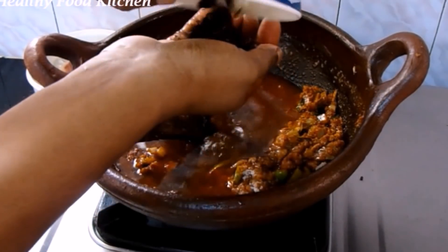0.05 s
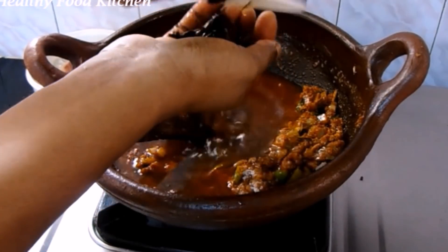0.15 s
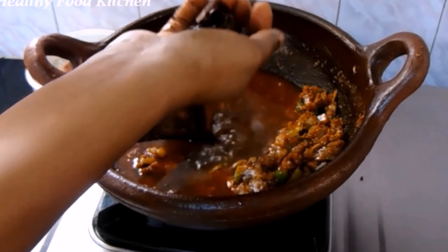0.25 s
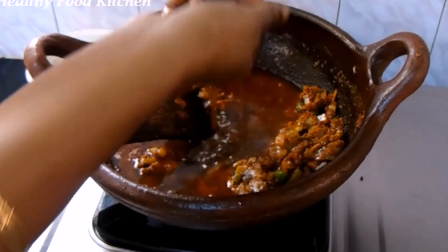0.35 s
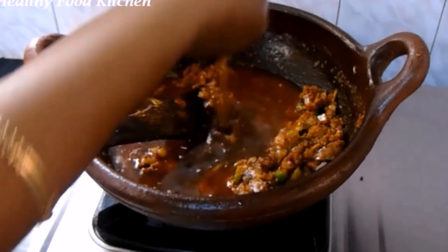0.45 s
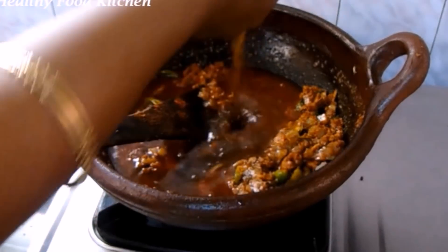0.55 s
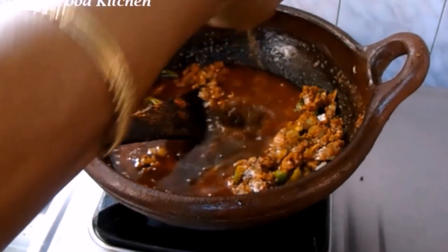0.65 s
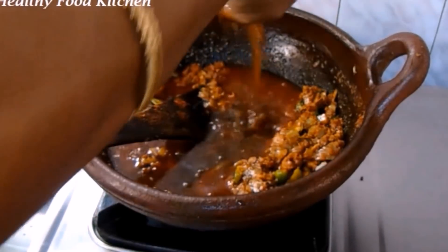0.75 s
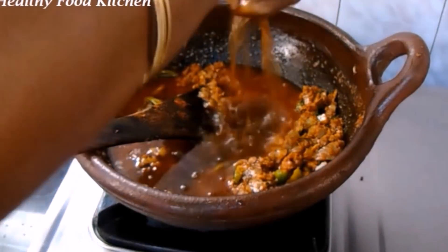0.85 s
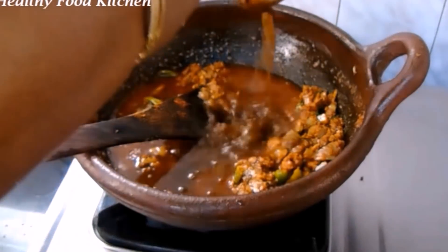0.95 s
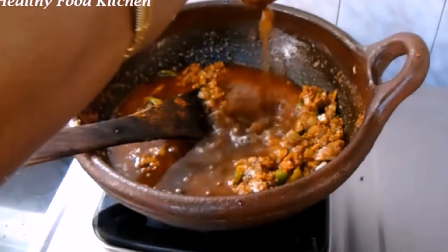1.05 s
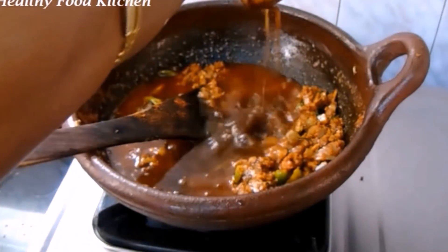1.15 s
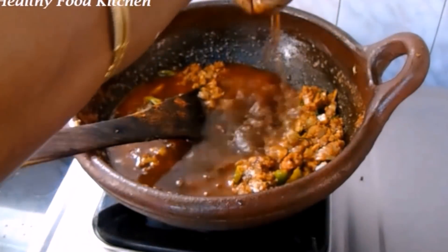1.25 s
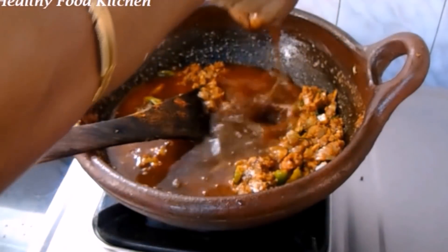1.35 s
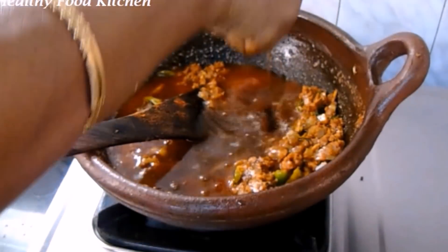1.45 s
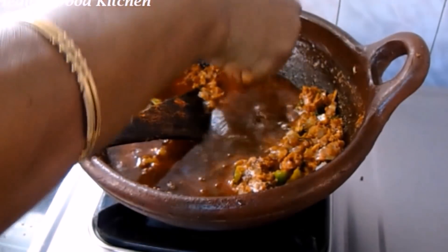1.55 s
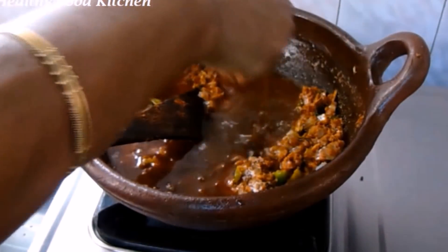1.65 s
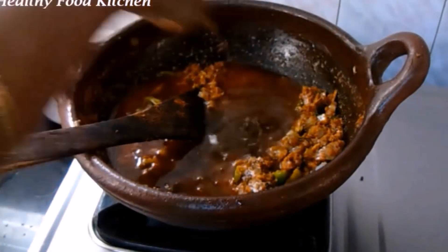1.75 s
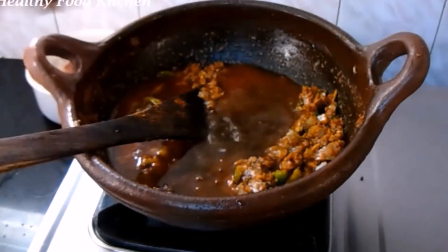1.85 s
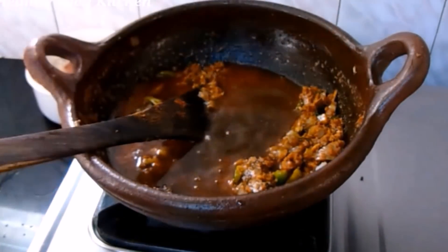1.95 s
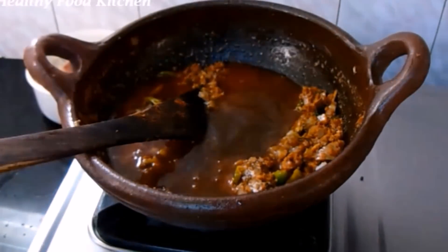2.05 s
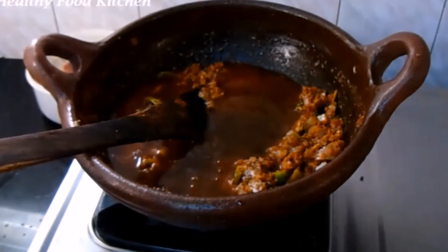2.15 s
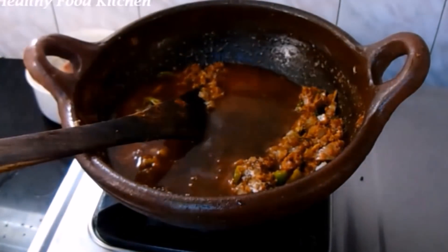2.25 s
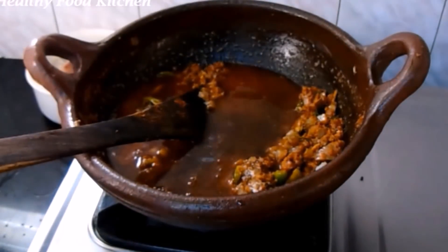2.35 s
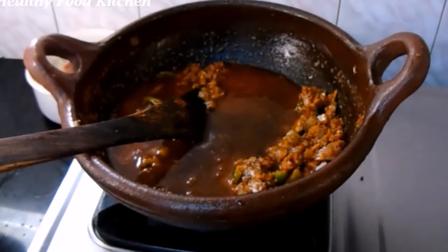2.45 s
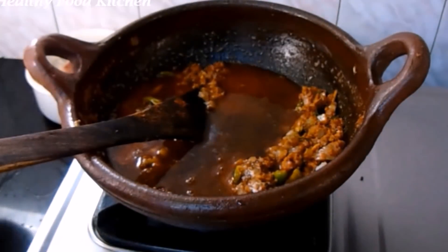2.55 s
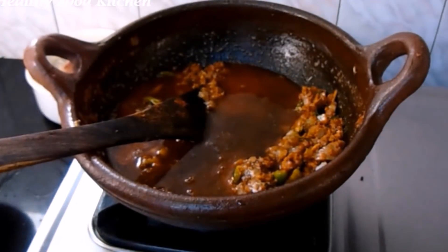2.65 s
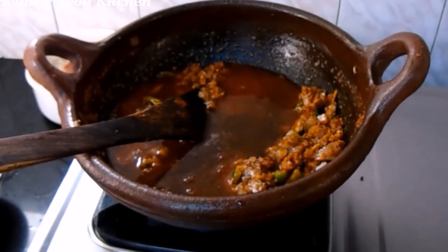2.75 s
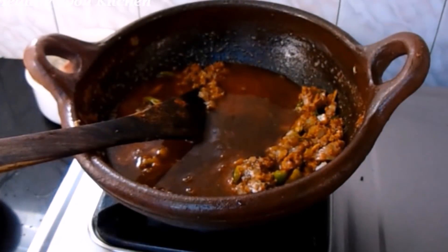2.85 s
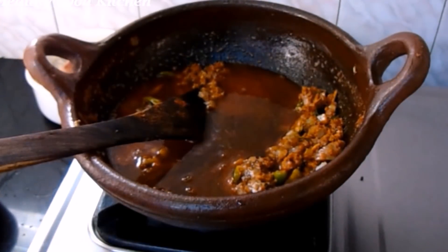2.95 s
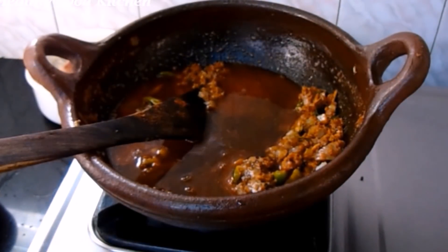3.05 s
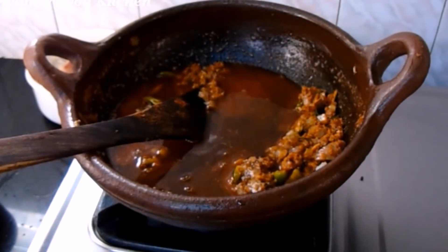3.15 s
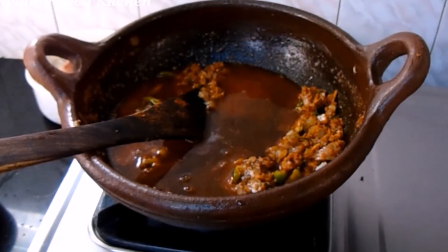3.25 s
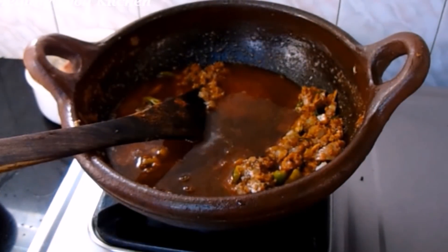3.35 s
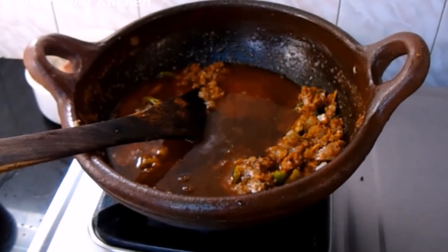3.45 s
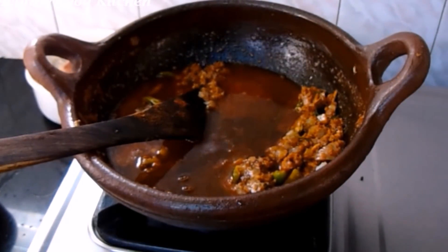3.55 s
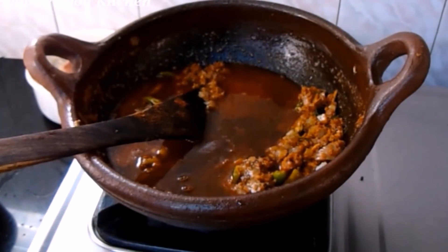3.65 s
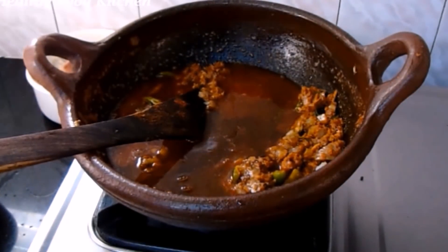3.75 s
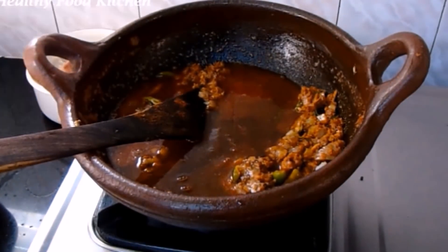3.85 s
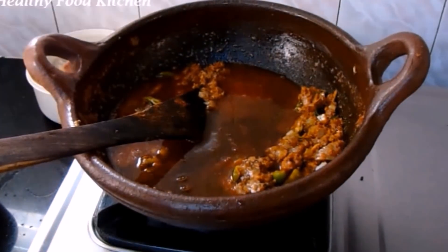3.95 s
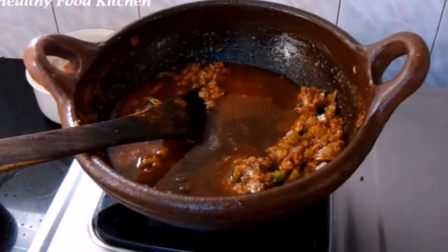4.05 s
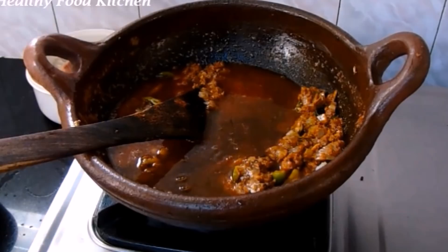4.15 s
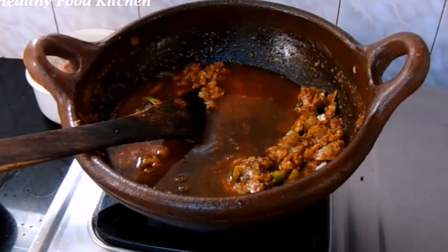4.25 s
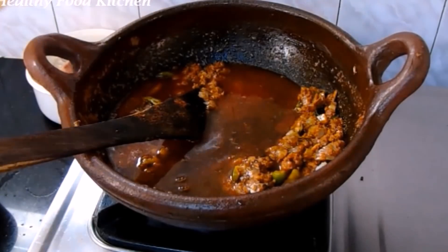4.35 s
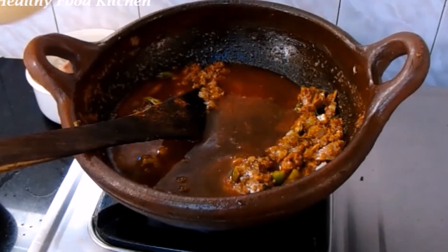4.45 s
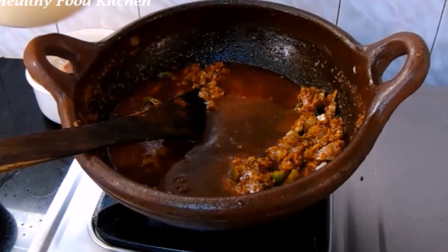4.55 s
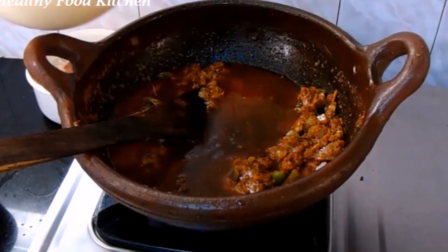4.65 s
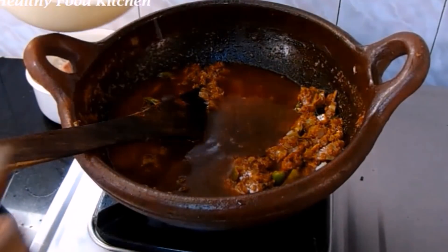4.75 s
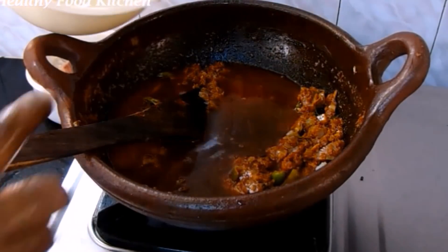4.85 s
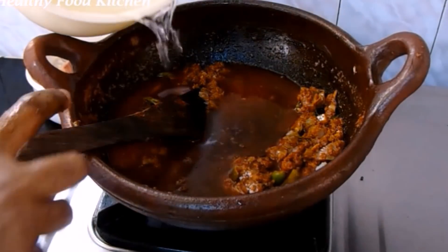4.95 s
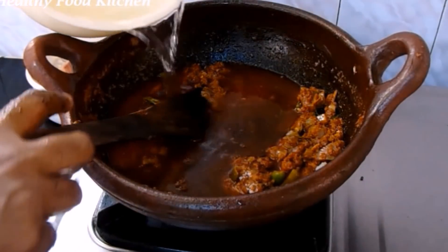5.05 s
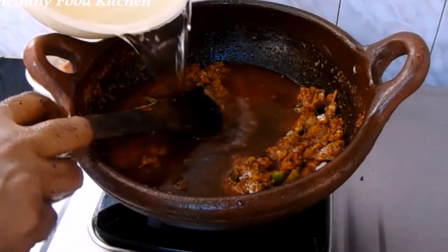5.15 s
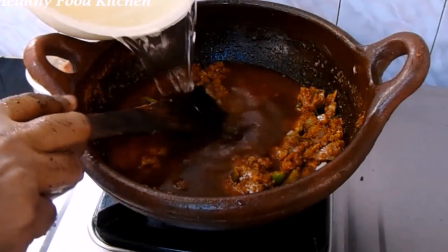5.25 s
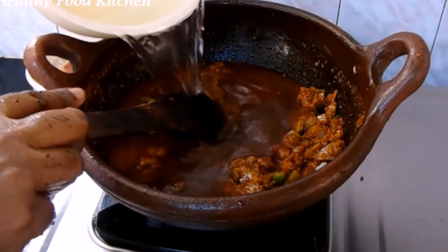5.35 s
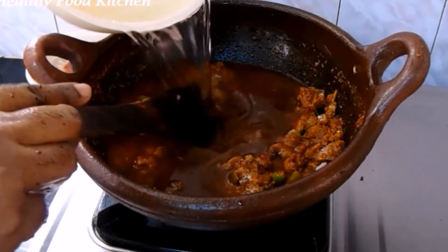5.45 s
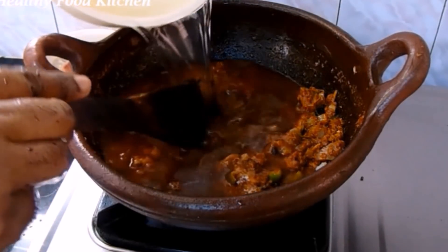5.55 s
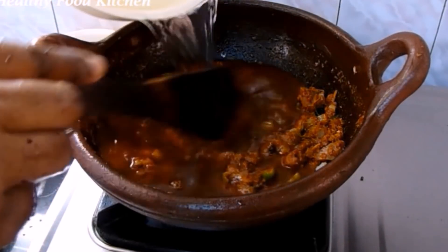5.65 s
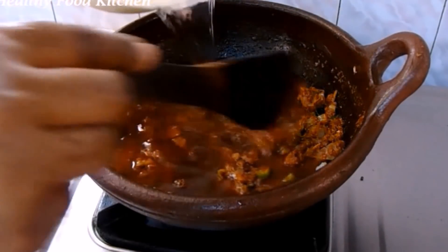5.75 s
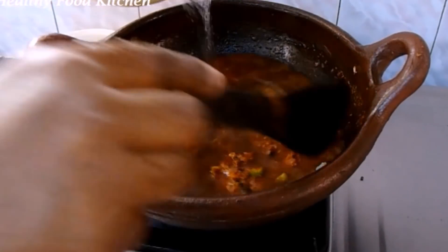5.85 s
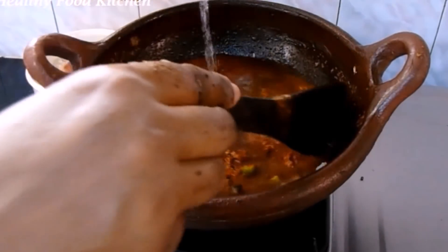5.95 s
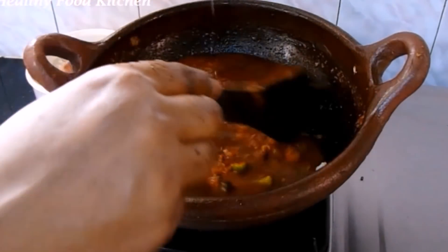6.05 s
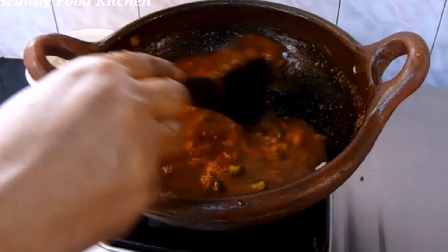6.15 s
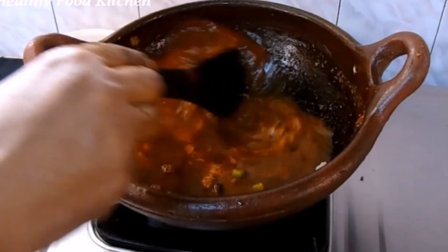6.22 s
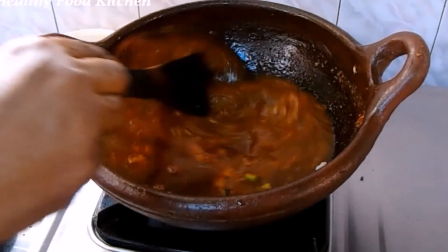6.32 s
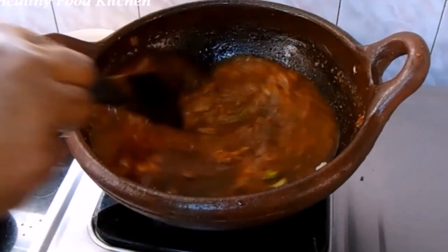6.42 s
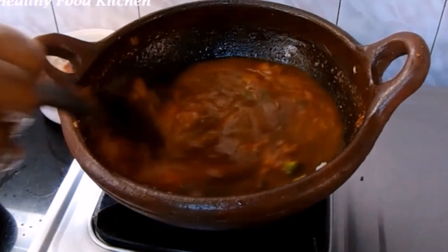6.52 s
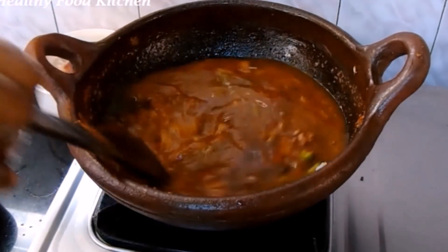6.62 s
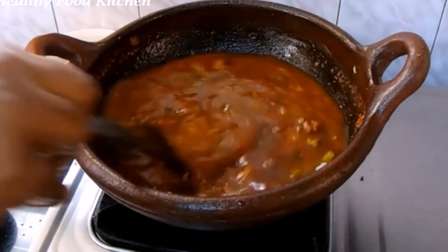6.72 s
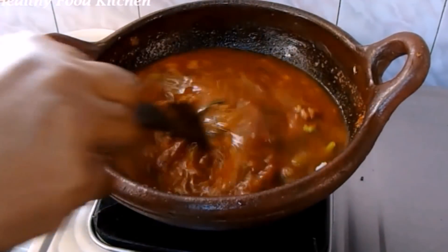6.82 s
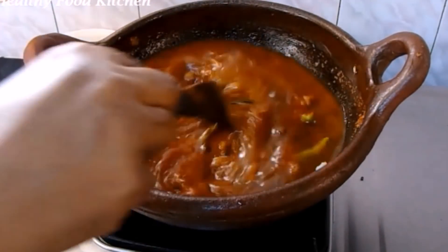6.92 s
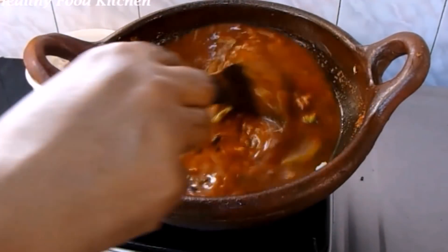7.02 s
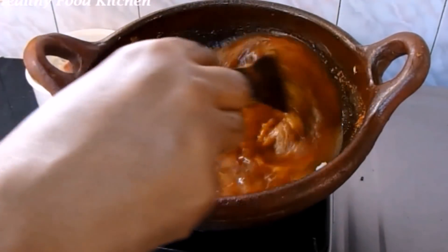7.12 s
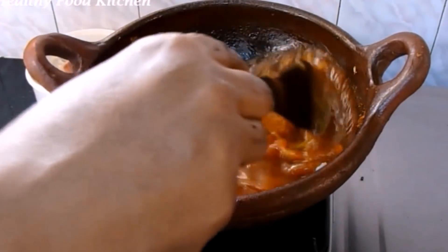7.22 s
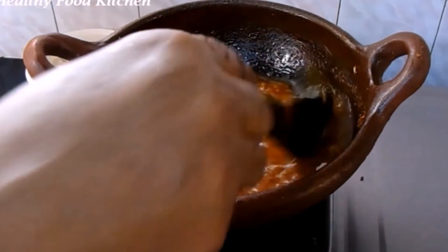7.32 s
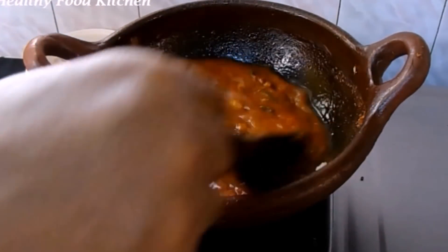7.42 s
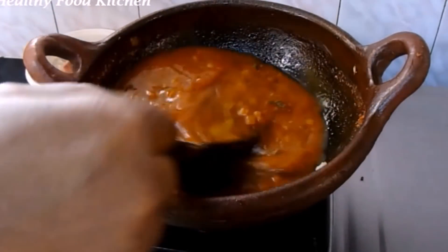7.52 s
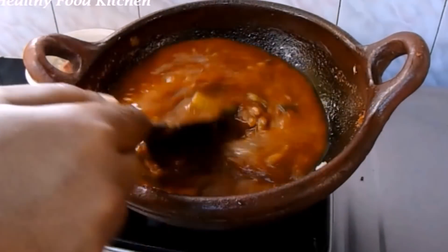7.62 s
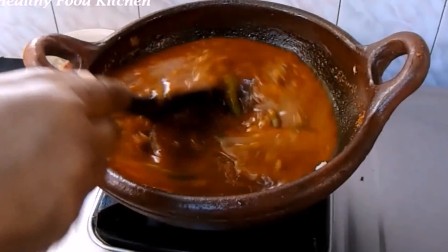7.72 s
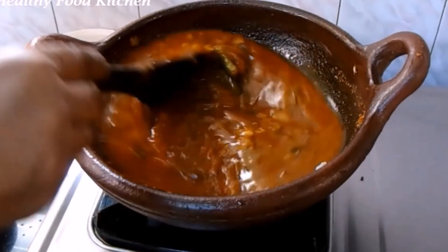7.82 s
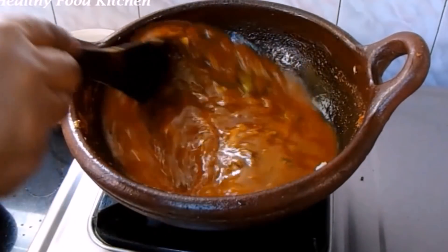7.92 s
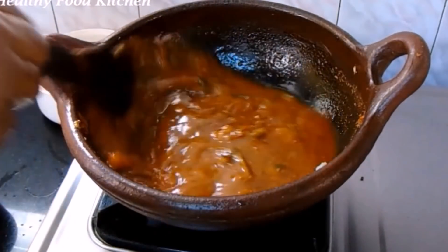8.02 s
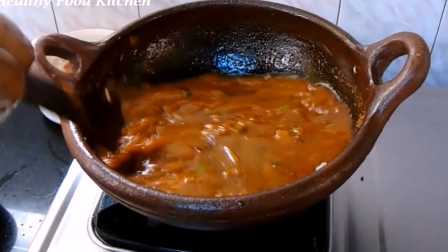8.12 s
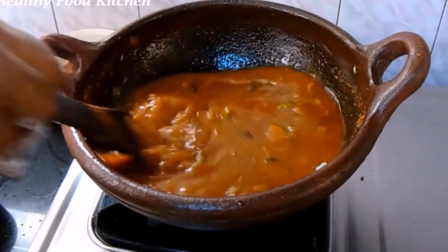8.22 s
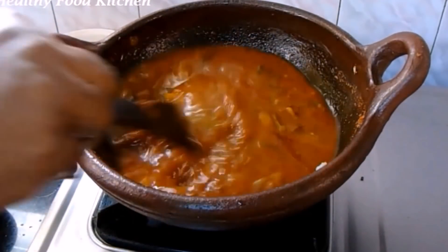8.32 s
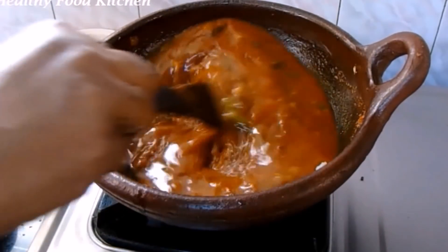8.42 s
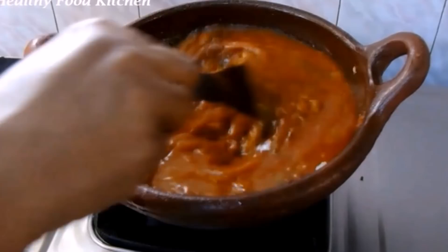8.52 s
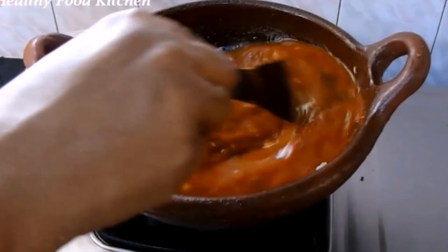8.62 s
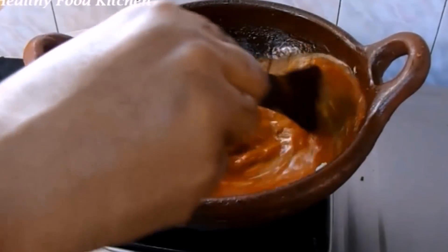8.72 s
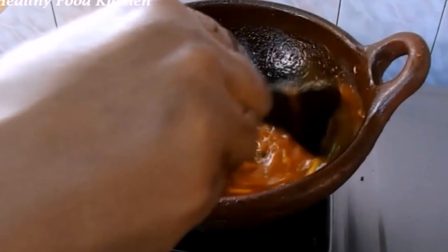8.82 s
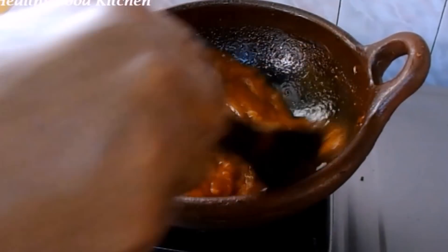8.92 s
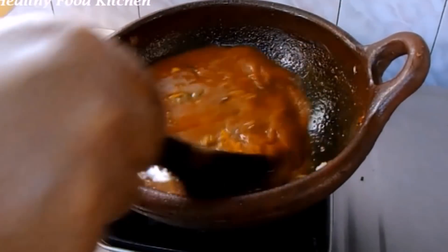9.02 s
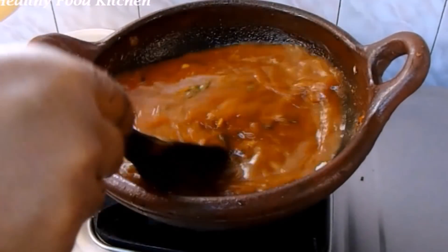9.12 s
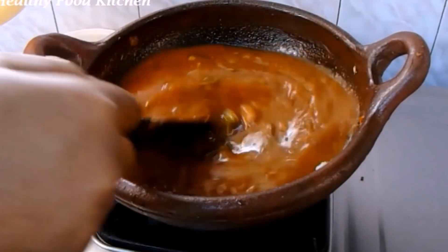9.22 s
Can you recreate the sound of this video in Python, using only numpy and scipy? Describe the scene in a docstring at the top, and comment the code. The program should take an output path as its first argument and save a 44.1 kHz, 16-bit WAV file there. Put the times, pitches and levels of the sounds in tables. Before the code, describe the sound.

Close to the microphone, curry sizzles sharply with bright spits while liquid trickles in and wet pulp squelches. Farther off in a small tiled kitchen, a vessel lands on the counter with one very loud, hard clack. Steady simmering continues over a fan hum; more water is poured, the sizzle flares and then sinks, and a wooden spoon sloshes, knocks and scrapes the clay.

```python
"""Curry sizzles and spits in a clay pot close to the microphone, over the hum of an induction cooker's fan.
Liquid trickles in and wet pulp squelches; farther off a vessel is set down hard on the counter of the small
tiled kitchen. More water is poured and the sizzle flares, then sinks as a wooden spoon stirs, knocks and
scrapes the clay. Bursts and bubbles make the frying and the gravy; decaying modes make the blows;
coloured noise makes the hiss, the air and the rumble."""
import sys
import numpy as np
from scipy import signal
from scipy.fft import rfft, irfft
from scipy.io import wavfile
from scipy.ndimage import uniform_filter1d

SR = 44100
rng = np.random.default_rng(int(sys.argv[2]) if len(sys.argv) > 2 else 0)


def transcribe(signal):
    """Save signal, clipped to [-1, 1], as a 16-bit WAV file at the path in sys.argv[1]."""
    frames = np.atleast_2d(signal).T
    limited = np.clip(frames, -1, 1)
    pcm = np.round(limited * 32767).astype(np.int16)
    wavfile.write(sys.argv[1], SR, pcm)


N = 409248
TIME = np.arange(N) / SR  # s

# Levels of single events are those before echoes and room; spectra give relative levels.
# Frying spectrum: (frequency [Hz], level [dB per Hz])
SIZZLE_SPECTRUM = [(400, -27), (900, -20.5), (1500, -10), (2600, -9), (4000, -8), (6500, -5), (8200, -2),
                   (10200, 1), (12000, -2.5), (14200, -10.5)]
# Liquid wets the hot wall and the sizzle flares: (time [s], hold [s], level [dB], fade [dB/s])
FLARES = [(-.45, 1.0, -31, 4), (5.352, 0.34, -30, 12.5), (8.416, .17, -41, 9)]
FLARE_RISE_S = 0.4
# The simmer is steady until cold water is stirred through it
SIMMER_DB, QUENCH_S, QUENCH_DB_PER_S = -44, 6.97, 23
# Sharp bright snaps: spits of oil, drops, ticks of the spoon, a squirt of pulp:
# (time [s], peak level [dB], pitch [Hz])
LOUD_SNAPS = [(.114, -15, 9370), (.263, -21.5, 4700), (0.534, -15, 9200), (.6315, -23, 10500),
              (0.7021, -12.5, 4530), (.703, -10, 7400), (0.8263, -26, 6240), (1.202, -16, 9590),
              (1.2389, -5.5, 9800), (2.152, -19, 9030), (2.157, -31, 3930), (2.16, -21, 7260),
              (3.623, -17, 10600), (3.846, -24, 11000), (4.697, -20, 10700), (5.12, -22.5, 4500),
              (5.51, -19, 7100), (5.526, -25.5, 4200), (6.062, -23, 6140), (7.3517, -31.5, 5280),
              (7.3525, -23, 9500), (8.166, -24.5, 10100), (8.1665, -33.5, 6030), (8.323, -29, 8800),
              (9, -15, 10900), (9.1174, -24, 9900)]
SNAP_HZ, SNAP_T60_S = 10050, 0.004  # a typical snap; lower ones ring longer
SMALL_SPITS_PER_S, SMALL_SPITS_DB = 9.4, -33.5

# Gushes of poured liquid: (time [s], hold [s], splash level [dB], gurgle level [dB])
GUSHES = [(-.1, 0.45, -61, -57.5), (0.808, 0.18, -53, -57.5), (1.203, 0.44, -60, -60.5),
          (1.904, 0.65, -56, -60), (3.615, 0.68, -60, -58), (5.1, 0.38, -52.5, -60.5),
          (5.42, 0.34, -47.5, -62), (5.628, 0.045, -43, -65), (6.038, 0.05, -47, -65),
          (6.191, 0.074, -64, -49)]
GUSH_RISE_S, GUSH_FADE_DB_PER_S = 0.021, 99
# Bright fizz of a gush: (frequency [Hz], level [dB])
SPLASH_SPECTRUM = [(300, -34), (650, -5), (1100, -1.5), (1900, 8.5), (2900, 12.5), (4200, 8.5),
                   (8000, 10.5)]
# Gurgle of plunging liquid: (frequency [Hz], level [dB])
GURGLE_SPECTRUM = [(350, -18), (650, -1), (900, 3.5), (1300, -6), (2200, -17), (5000, -43)]
# Stirred gravy: (frequency [Hz], level [dB])
SLOSH_SPECTRUM = [(300, -24), (700, -6.5), (1100, -4.5), (1550, 1.5), (2200, 5), (3000, 4.5), (4200, 5),
                  (8000, -5)]
# Sweeps of the spoon through the gravy: (middle time [s], level [dB])
SWEEPS = [(6.45, -56.5), (6.78, -49.5), (7.27, -50.5), (7.75, -54.5), (8.05, -57.5), (8.58, -50),
          (9.32, -49.5)]
SWEEP_S = 0.45
# Brief ringing tones, from large bubbles and drips to thin high pips:
# (time [s], peak level [dB], starting pitch [Hz], T60 [s])
RINGING_TONES = [(.88, -42, 930, 0.04), (.903, -35, 3490, 0.064), (0.906, -34, 4710, 0.069),
                 (.965, -34, 2390, 0.029), (.986, -38, 1320, .03), (.989, -33, 2510, .025),
                 (1.065, -41.5, 870, .04), (1.305, -43.5, 1560, 0.11), (1.38, -44, 1310, 0.097),
                 (5.121, -39.5, 2970, 0.029), (5.285, -48, 960, 0.14), (5.312, -44, 1327, 0.066),
                 (5.355, -48, 594, 0.081), (5.398, -38.5, 2240, 0.079), (5.402, -43, 2410, 0.054),
                 (5.507, -37.5, 790, 0.024), (5.663, -32, 3030, 0.049), (5.765, -39, 3250, 0.12),
                 (5.78, -36, 3850, 0.096), (6.06, -42, 660, 0.045), (6.075, -38, 3070, .07),
                 (6.118, -44, 1270, 0.059), (6.215, -44, 688, 0.035), (6.27, -49, 840, 0.058),
                 (8.175, -46, 1405, 0.13), (8.418, -41, 1472, .08), (8.426, -47.5, 2920, 0.1),
                 (8.455, -40, 947, 0.09), (8.508, -42, 2000, 0.072), (8.513, -48, 2250, .08)]
TONE_SWELL, TONE_RISE = 0.104, 0.042  # share of the ring time, share of the pitch

# Spoon striking the clay: (time [s], level [dB], favoured pitch [Hz])
TAPS = [(7.667, -48, 1540), (7.7386, -44, 1410), (7.8106, -38.5, 2510), (8.172, -27, 1356),
        (8.241, -37, 1450), (8.2617, -31.5, 1306), (8.326, -34, 2330), (8.396, -19, 1039),
        (8.402, -24.5, 4350), (8.576, -27, 1280)]
TAP_ATTACK_S = 0.00074  # gravy cushions the blow
# Spoon dragged over the clay: (middle time [s], length [s], level [dB], favoured pitch [Hz])
SCRAPES = [(7.74, 0.3, -57, 1480), (8.326, 0.16, -45, 2257), (8.458, 0.16, -42, 1506),
           (8.58, 0.06, -45, 2070)]
# Modes of the filled clay pot: (frequency [Hz], level [dB], T60 [s])
CLAY_MODES = [(1013, -1, 0.044), (1325, -2.5, 0.072), (1438, -7, 0.053), (1950, -5, 0.076),
              (2420, -1, 0.044), (2820, 1.5, 0.035), (4230, 1, 0.028), (4410, 0, 0.025), (5260, -2, 0.038)]
# Rough noise of contact in every blow: (frequency [Hz], level [dB per Hz])
CRACK_SPECTRUM = [(200, -29), (450, -21), (850, -8), (1350, 11), (2500, 0), (3300, -14), (4200, 0),
                  (5500, -3), (10000, 0), (14000, -11)]
# Squeezed pulp: (frequency [Hz], level [dB])
SQUELCH_SPECTRUM = [(90, -5), (250, -3), (450, 6.0), (1000, -16), (2500, 2), (4500, -3), (8000, -13)]

# Vessel meeting the counter, with its rebounds: (time [s], level [dB])
KNOCKS = [(2.8394, 5), (2.8431, 6), (2.848, -4), (2.876, -2)]
# Modes of the vessel: (frequency [Hz], level [dB], T60 [s])
VESSEL_MODES = [(1250, -7, .06), (1261, 1.5, 0.08), (1300, -5.5, 0.044), (1450, -0.5, .06),
                (1470, -3.5, .05), (1560, -6, 0.027), (1700, -11, 0.04), (1890, -15, 0.025),
                (2100, -24, 0.012), (2470, -14, .016), (2720, -5, 0.018), (4160, -12, 0.018),
                (4600, -11, 0.013), (5480, 0.5, 0.029), (7340, 10.5, 0.017), (7395, 12.5, 0.028),
                (9180, -0.5, 0.03), (9740, 3, 0.036), (10060, -5, .026)]
# Dull low bumps: (time [s], peak level [dB])
BUMPS = [(1.934, -51), (2.262, -32), (2.375, -42), (2.51, -51.5)]
BUMP_HZ, BUMP_S = 106.4, 0.11
# Low rumbles, the first as the knock dies away, the rest as things are shifted:
# (middle time [s], length [s], level [dB], pitch [Hz])
COUNTER_RUMBLES = [(2.91, .18, -50, 140), (3.602, 0.25, -54, 105), (3.955, 0.23, -53, 118),
                   (4.16, .16, -54.5, 145), (4.92, 0.11, -57, 190)]

# Rushing air of the fan: (frequency [Hz], level [dB per Hz])
FAN_SPECTRUM = [(25, -3.5), (55, -23), (110, -3.5), (180, -4), (255, 0.5), (330, -0.5), (500, -1.5),
                (750, -3), (1050, -7.5), (1450, -3), (2500, -17.5), (5000, -26.5), (14000, -60)]
# Low rumble: (frequency [Hz], level [dB])
RUMBLE_SPECTRUM = [(20, -9), (40, 2.5), (54, 4.5), (82, 2.5), (130, -42), (300, -31), (1000, -80)]
RUMBLE_DB = -69.5
# Swells added to the steady rumble: (middle time [s], length [s], level [dB])
RUMBLE_SWELLS = [(1.7, 2.9, -62.5), (3.8, 0.82, -63), (6.95, 0.32, -62.5), (7.93, 0.84, -55.5)]

# Decay of the tiled room: (frequency [Hz], T60 [s])
ROOM_DECAY = [(150, 0.68), (600, 0.56), (1400, 0.67), (3000, 0.55), (7500, 0.41), (14000, 0.32)]
# Brief dips of the level: (middle time [s], length [s], depth before the share by frequency [dB])
DIPS = [(0.098, 0.022, 7.5), (0.289, 0.013, 11), (0.529, 0.014, 8), (.914, 0.017, 8), (1.179, 0.013, 5),
        (1.252, 0.011, 11), (1.309, 0.018, 15), (1.489, 0.024, 8), (1.574, 0.017, 10), (1.636, .02, 4),
        (1.759, 0.015, 7), (1.877, 0.021, 10), (1.993, 0.014, 6), (2.032, 0.014, 10), (2.086, 0.016, 8.5),
        (2.21, .013, 7), (2.277, 0.018, 6), (2.326, 0.018, 10), (2.364, 0.02, 8), (3.023, 0.012, 4),
        (3.264, 0.024, 11), (3.444, 0.026, 7.5), (4.553, 0.02, 13), (4.897, 0.016, 9.5), (5.151, 0.021, 9),
        (5.258, 0.017, 6), (5.385, 0.031, 7), (5.546, 0.011, 9), (5.589, 0.016, 3.5), (5.784, 0.035, 6),
        (5.966, 0.019, 10), (6.045, 0.012, 7.5), (6.25, 0.018, 16), (6.321, 0.017, 9), (6.345, 0.013, 7),
        (6.441, 0.014, 10.5), (6.472, 0.016, 12.5), (6.503, 0.017, 11), (6.688, 0.021, 15),
        (6.984, 0.017, 5.5), (7.049, 0.016, 11), (7.091, 0.02, 17), (7.457, 0.021, 6), (7.525, .016, 2),
        (7.771, .024, 7), (7.945, 0.019, 5), (8.148, 0.016, 1), (8.216, 0.02, 14), (8.432, 0.019, 2.5),
        (8.744, 0.026, 5), (8.862, .032, 9), (9.038, .015, 7)]
# How much of a dip each frequency takes: (frequency [Hz], share of the depth)
DIP_SHARE = [(60, 0.76), (300, 0.041), (600, 2.55), (5000, 1.92), (7500, 1.15), (9500, 0.14),
             (14000, 0.091)]
EDGE_HZ = 14400  # upper band limit


def sizzle(crackle_db=-2.5, hiss_db=-2.0, flutter_db=0.72, clump_db=2.3):
    """Countless steam bubbles burst: the near ones crackle, the rest merge to a hiss."""
    bursts = clicks(per_s=3500, spread_db=4.0)
    crackle = unit(bowl(colour(bursts, SIZZLE_SPECTRUM)))
    hiss = patchy(colour(rng.standard_normal(N), SIZZLE_SPECTRUM), clump_db)
    frying = amp(crackle_db) * crackle + amp(hiss_db) * hiss
    return heat() * frying * amp(flutter_db * drift(21))


def heat():
    """How hard the pot fries: the simmer and the flares add in power."""
    simmer = amp(SIMMER_DB - QUENCH_DB_PER_S * np.maximum(TIME - QUENCH_S, 0))
    flares = [amp(db) * surge(s, FLARE_RISE_S, hold, fade) for s, hold, db, fade in FLARES]
    return np.sqrt(simmer ** 2 + sum(flare ** 2 for flare in flares))


def patchy(x, depth_db):
    """Lets each region of pitch flicker on its own, as bubbles burst in clumps."""
    z = signal.stft(x, SR, nperseg=256)[2]
    patches = uniform_filter1d(rng.standard_normal(z.shape), size=7, axis=0)  # across frequency
    patches = unit(uniform_filter1d(patches, size=6, axis=1))  # along time
    return unit(signal.istft(z * amp(depth_db * patches), SR)[1][:N])


def snaps(spread_db=3, spread_octaves=0.15, follow=0.91):
    """Sharp bright snaps stand among many small random spits, which grow with the heat."""
    out = np.zeros(N)
    strength = (heat() / amp(SIMMER_DB)) ** follow
    for s, db, hz in LOUD_SNAPS:
        add(out, s, amp(db) * snap(hz))
    for at in np.flatnonzero(rng.random(N) < SMALL_SPITS_PER_S / SR):
        size, pitch = rng.standard_normal(2)
        gain = strength[at] * amp(SMALL_SPITS_DB + spread_db * size)
        add(out, at / SR, gain * snap(SNAP_HZ * 2 ** (spread_octaves * pitch)))
    return bowl(out)


def snap(hz, width=0.3):
    """A short burst of noise rings around one pitch: a sharp snap of peak 1."""
    t = np.arange(SR // 20) / SR
    t60 = SNAP_T60_S * (SNAP_HZ / hz) ** 2
    burst = rng.standard_normal(len(t)) * decay(t, t60)
    burst = band(band(burst, hz, width * hz), hz, width * hz)
    return burst / abs(burst).max()


def gravy():
    """Gushes fizz brightly and gurgle as they plunge, spoon sweeps slosh, brief tones ring."""
    splash, gurgle = np.zeros((2, N))
    for s, hold, splash_db, gurgle_db in GUSHES:
        flow = surge(s, GUSH_RISE_S, hold, GUSH_FADE_DB_PER_S)
        splash = np.maximum(splash, amp(splash_db) * flow)
        gurgle = np.maximum(gurgle, amp(gurgle_db) * flow)
    stir = sum(amp(db) * swell(s, SWEEP_S) for s, db in SWEEPS)
    out = splash * liquid(SPLASH_SPECTRUM, per_s=700, cycles=45, spread_db=5.5, wash_db=-4, surge_db=5.0)
    out += gurgle * liquid(GURGLE_SPECTRUM, per_s=480, cycles=30, spread_db=3.0, wash_db=-8, surge_db=-0.5)
    out += stir * liquid(SLOSH_SPECTRUM, per_s=380, cycles=110, spread_db=2.5, wash_db=-3, surge_db=3.0)
    for s, db, hz, t60 in RINGING_TONES:
        add(out, s, amp(db) * ringing_tone(hz, t60))
    return out


def liquid(spectrum, per_s, cycles, spread_db, wash_db, surge_db):
    """Moving liquid surges, trapping bubbles, each of its own size, over a wet wash."""
    swarm = np.zeros(N)
    for when, size, strength in rng.random((int(per_s * N / SR), 3)):
        hz = 480 * (5500 / 480) ** size  # 480 to 5500 Hz, even by octave
        db = at_hz(spectrum, hz) + spread_db * min(-np.log(1 - strength), 3)
        add(swarm, when * N / SR, amp(db) * bubble(hz, cycles / hz, rise=0.039))
    wash = colour(rng.standard_normal(N), spectrum)
    return amp(surge_db * np.tanh(drift(18.0))) * unit(unit(swarm) + amp(wash_db) * wash)


def bubble(hz, t60, rise):
    """A trapped air pocket rings, its pitch rising as it nears the surface."""
    t = np.arange(0, t60, 1 / SR)
    ring = np.sin(2 * np.pi * hz * t * (1 + rise * t / t60))
    return ring * decay(t, t60) * (1 - np.exp(-hz * t))


def ringing_tone(hz, t60):
    """A brief tone, rising like a bubble's, swells before it dies away; peak 1."""
    ring = bubble(hz, t60, rise=TONE_RISE)
    ring = ring * np.minimum(TIME[:len(ring)] / (TONE_SWELL * t60), 1)
    return ring / abs(ring).max()


def spoon(slips_per_s=380, bend=0.09, pressure_db=3):
    """Wood strikes the clay, then sticks and slips along it, ringing the same modes."""
    slips, scrape = clicks(slips_per_s, spread_db=2.5), np.zeros(N)
    for s, length, db, centre_hz in SCRAPES:
        ring = blow(clay_at(centre_hz), crack_db=-5, crack_t60=0.024)
        scrape += amp(db) * swell(s, length) * unit(signal.oaconvolve(slips, ring)[:N])
    # gravy sloshing against the wall bends the modes up and down: a leaky sum of drift shifts time
    lag_s = signal.lfilter([1 / SR], [1, 2 / SR - 1], bend * drift(9))
    bent = np.interp(TIME + lag_s, TIME, scrape)
    out = amp(pressure_db * np.tanh(drift(24))) * bent
    for s, db, centre_hz in TAPS:
        tap = blow(clay_at(centre_hz), crack_db=-13, crack_t60=.045)
        add(out, s, amp(db) * tap * np.minimum(TIME[:len(tap)] / TAP_ATTACK_S, 1))
    return out


def clay_at(centre_hz, focus_db=7):
    """The touched spot pulls the nearest mode to its pitch; all shift along, farther ones weaker."""
    nearest_hz = min((hz for hz, db, t60 in CLAY_MODES), key=lambda hz: abs(hz - centre_hz))
    shift = centre_hz / nearest_hz
    modes = []
    for hz, db, t60 in CLAY_MODES:
        octaves = abs(np.log2(shift * hz / centre_hz))
        modes.append((shift * hz, db - focus_db * octaves ** .5, t60))
    return modes


def squelch(s=0.24, length=0.067, db=-39, thud_s=.233, thud_db=-42.5):
    """Wet pulp is squeezed in the hand above the pot: dense clicks, with a soft thud."""
    out, count = np.zeros(N), int(length * SR)
    bursts = colour(clicks(per_s=840, spread_db=3.0), SQUELCH_SPECTRUM)
    add(out, s, amp(db) * unit(bursts[:count]) * signal.windows.tukey(count))
    add(out, thud_s, amp(thud_db) * thud(hz=251.6, length_s=0.093))
    return out


def vessel():
    """A hard vessel lands on one edge, then flat, and rocks once."""
    out = np.zeros(N)
    for s, db in KNOCKS:
        add(out, s, amp(db) * blow(VESSEL_MODES, crack_db=-14.5, crack_t60=0.046))
    return out


def bumps():
    """Dull bumps, all at one pitch, each a short swelling sine."""
    out = np.zeros(N)
    for s, db in BUMPS:
        add(out, s, amp(db) * thud(BUMP_HZ, BUMP_S))
    return out


def counter(width_hz=60):
    """The counter rumbles low, after the knock and as things are shifted: noise through resonances."""
    noise, out = rng.standard_normal(N), np.zeros(N)
    for s, length, db, hz in COUNTER_RUMBLES:
        rumble = band(band(noise, hz, width_hz), hz, width_hz)
        out += amp(db) * swell(s, length) * unit(rumble)
    return out


def cooker(blade_hz=294.2, tone_db=-54, air_db=-54, waver=0.0042, throb_db=2.1):
    """The cooling fan: a wavering blade tone in rushing air, over a low rumble."""
    cycles = np.cumsum(blade_hz * (1 + waver * drift(6.8))) / SR
    tone = unit(np.sin(2 * np.pi * cycles)) * amp(tone_db + throb_db * drift(34))
    air = amp(air_db) * colour(rng.standard_normal(N), FAN_SPECTRUM)
    rumble_gain = amp(RUMBLE_DB) + sum(amp(db) * swell(s, length) for s, length, db in RUMBLE_SWELLS)
    return tone + air + rumble_gain * colour(rng.standard_normal(N), RUMBLE_SPECTRUM)


def bowl(x, echo_db=-5):
    """Sound made inside the pot bounces between its walls for a few milliseconds."""
    t = np.arange(SR // 20) / SR
    taps = rng.standard_normal(len(t)) * (rng.random(len(t)) < .06) * (t > .001)
    taps *= decay(t, .03)
    return x + amp(echo_db) * signal.oaconvolve(x, taps / np.linalg.norm(taps))[:N]


def kitchen(x, wet_db):
    """Direct sound plus the tail of the tiled room, each band dying at its own speed."""
    # sparse echoes of either sign, after a 4 ms gap
    taps = rng.choice([-1., 1.], SR) * (rng.random(SR) < .1) * (np.arange(SR) > SR // 250)
    hz, t, z = signal.stft(taps, SR, nperseg=256)
    tail = signal.istft(z * decay(t, at_hz(ROOM_DECAY, hz)[:, None]), SR)[1]
    return x + amp(wet_db) * signal.oaconvolve(x, tail / np.linalg.norm(tail))[:N]


def dips(x, stand_out_db=7.0, tones_db=5, full_length_s=0.016):
    """The level dips briefly, mostly below the fine treble; a few thin tones linger through it."""
    out, size = x.copy(), 4096
    hz, t = np.fft.rfftfreq(size, 1 / SR), (np.arange(size) - size // 2) / SR
    window = signal.windows.hann(size)
    for s, length, depth_db in DIPS:
        start = round(s * SR) - size // 2
        part = x[start:start + size]
        dipped = irfft(rfft(part) * amp(-depth_db * at_hz(DIP_SHARE, hz)))
        # the tones are the bins that stand out from their neighbours
        z = rfft(part * window)
        power = abs(z) ** 2
        strong = power > amp(stand_out_db) ** 2 * uniform_filter1d(power, size=80)
        strong &= (hz > 500) & (hz < 10000)
        tones_gain = amp(tones_db) * min(length / full_length_s, 1)  # weaker in short dips
        tones = tones_gain * irfft(z * strong) * window ** 2
        add(out, start / SR, (dipped - part) * np.exp(-(1.47 * t / length) ** 4) + tones)
    return out


def blow(modes, crack_db, crack_t60, bass_hz=300):
    """One impact: dying modes scaled to peak 1, and the rough crack of contact."""
    t = np.arange(SR // 4) / SR
    ring = sum(amp(db) * np.sin(2 * np.pi * hz * t) * decay(t, t60) for hz, db, t60 in modes)
    crack = colour(rng.standard_normal(len(t)), CRACK_SPECTRUM) * decay(t, crack_t60)
    impact = ring / abs(ring).max() + amp(crack_db) * crack
    # a small body radiates little bass
    return signal.lfilter(*signal.butter(2, bass_hz, "high", fs=SR), impact)


def thud(hz, length_s):
    """A soft low thud swells and fades within its length."""
    t = np.arange(0, length_s, 1 / SR)
    return np.sin(2 * np.pi * hz * t) * np.sin(np.pi * t / length_s) ** 2


def surge(s, rise_s, hold_s, fade_db_per_s):
    """Gain that rises from time s, holds, then dies away."""
    t = TIME - s
    return np.clip(t / rise_s, 0, 1) * amp(-fade_db_per_s * np.maximum(t - rise_s - hold_s, 0))


def swell(middle_s, length_s):
    """Gain that comes and goes in a bell shape, 1/e at half the length from its middle."""
    return np.exp(-(2 * (TIME - middle_s) / length_s) ** 2)


def decay(t, t60):
    """Gain that falls 60 dB in t60 seconds."""
    return np.exp(-np.log(1000) * t / t60)


def drift(per_s):
    """A smooth random wander of rms 1, mostly slower than per_s [Hz]."""
    hz = np.fft.rfftfreq(N, 1 / SR)
    return unit(irfft(rfft(rng.standard_normal(N)) / (1 + (hz / per_s) ** 4), N))


def clicks(per_s, spread_db):
    """Random clicks of either sign, most small and a few large."""
    size_db = spread_db * np.minimum(rng.exponential(1, N), 4)
    return (rng.random(N) < per_s / SR) * rng.choice([-1, 1], N) * amp(size_db)


def band(x, hz, width_hz):
    """One resonance of the given width."""
    return signal.lfilter(*signal.iirpeak(min(hz, SR / 2 - 1), hz / width_hz, SR), x)


def colour(x, spectrum):
    """Shapes x by a spectrum of rows (frequency [Hz], level [dB]), at rms 1."""
    gain = amp(at_hz(spectrum, np.fft.rfftfreq(len(x), 1 / SR)))
    return unit(irfft(rfft(x) * gain, len(x)))


def at_hz(points, hz):
    """Reads rows (frequency [Hz], value) on a log-frequency axis."""
    f, value = np.transpose(points)
    return np.interp(np.log(hz + 1), np.log(f), value)


def amp(db):
    """Decibels to gain."""
    return 10 ** (np.asarray(db) / 20)


def unit(x):
    """Scales to rms 1."""
    return x / np.sqrt(np.mean(x ** 2) + 1e-20)


def add(mix, s, sound):
    """Mixes a sound in at time s, or at the start if s is negative."""
    part = mix[max(round(s * SR), 0):][:len(sound)]
    part += sound[:len(part)]


def scene():
    """The pot is near; the vessel stands farther off and fills the room."""
    pot = kitchen(gravy() + spoon() + squelch(), wet_db=-5.5)
    pot += kitchen(snaps(), wet_db=-6.5) + sizzle()
    far = kitchen(vessel(), wet_db=-2.5)
    return dips(pot + far + bumps() + counter() + cooker())[None]


def record(dry, threshold_db=-16, most_db=6.5, recover_db_per_s=3.5):
    """The loud knock overloads the microphone and turns its gain down for a while; then the band limit."""
    power = signal.lfilter(*signal.butter(1, 16, fs=SR), dry[0] ** 2)
    power_db = 10 * np.log10(power + 1e-12)
    # hold the largest reduction, letting it recover at a steady rate
    fall = recover_db_per_s * TIME
    duck_db = np.maximum.accumulate(np.clip(power_db - threshold_db, 0, most_db) + fall) - fall
    duck_db = signal.lfilter(*signal.butter(1, 6, fs=SR), duck_db)
    clipped = np.clip(dry * amp(-duck_db), -1, 1)
    lowpass = signal.firwin(401, EDGE_HZ, window=("kaiser", 8), fs=SR)
    return signal.oaconvolve(clipped, lowpass[None], "same")


dry = scene()
out = record(dry)
transcribe(out)
```